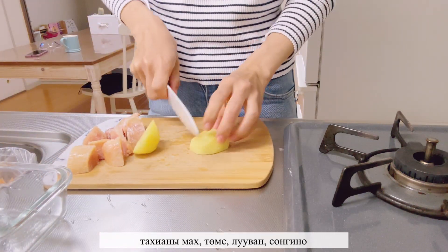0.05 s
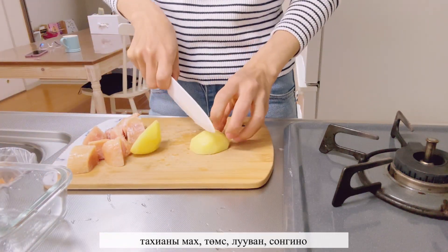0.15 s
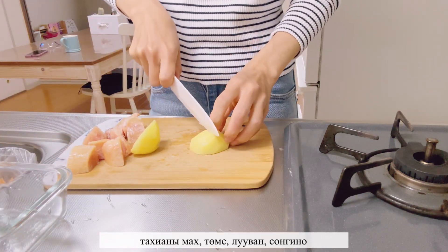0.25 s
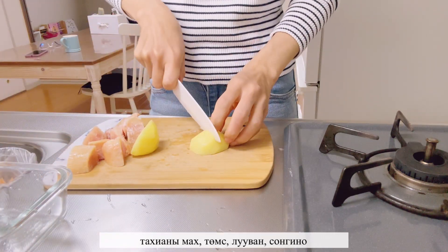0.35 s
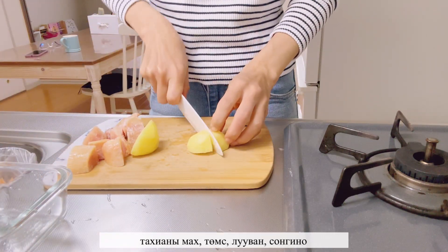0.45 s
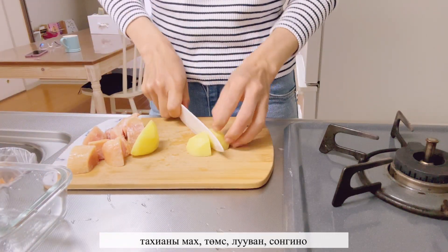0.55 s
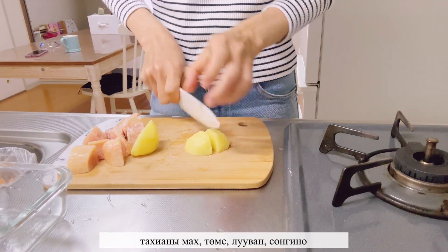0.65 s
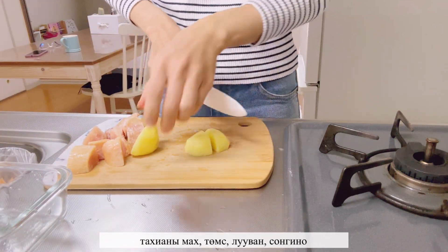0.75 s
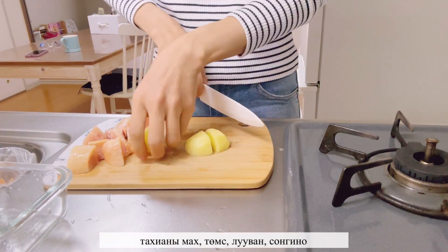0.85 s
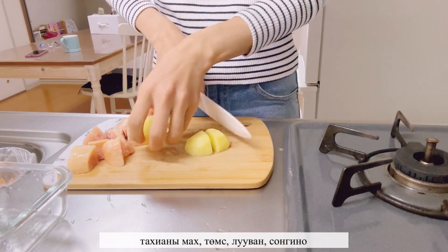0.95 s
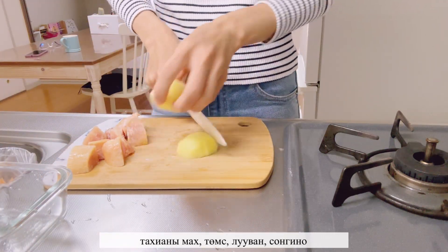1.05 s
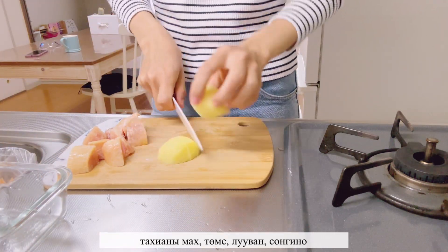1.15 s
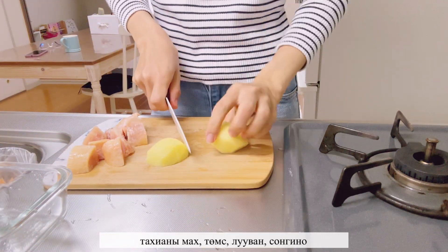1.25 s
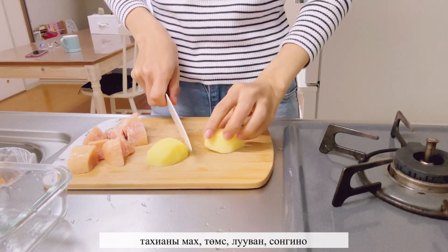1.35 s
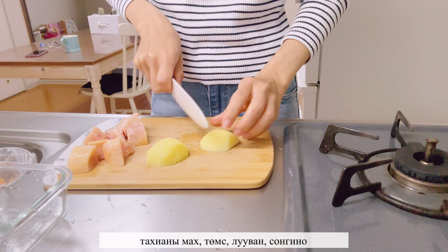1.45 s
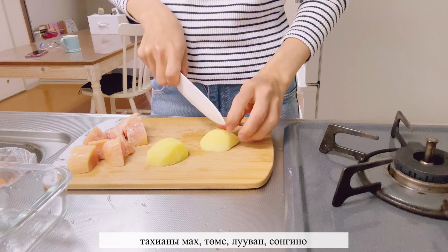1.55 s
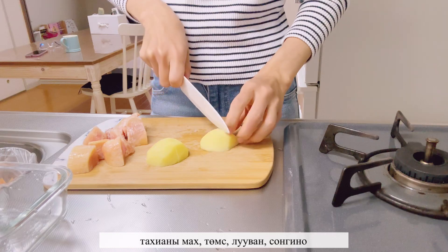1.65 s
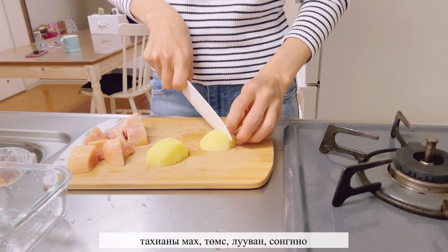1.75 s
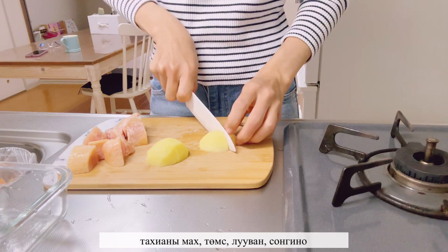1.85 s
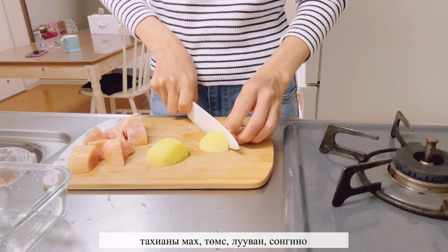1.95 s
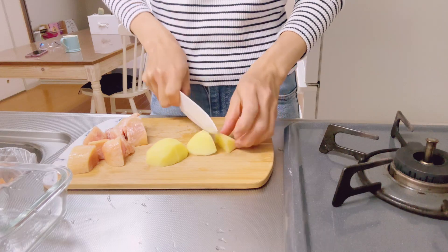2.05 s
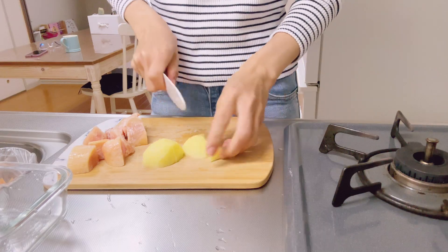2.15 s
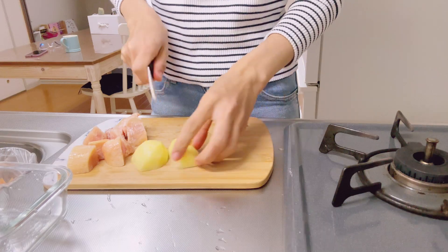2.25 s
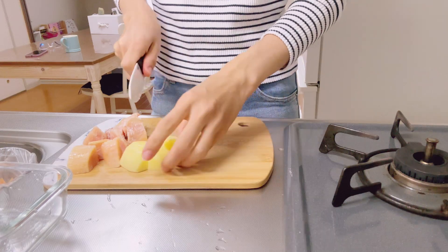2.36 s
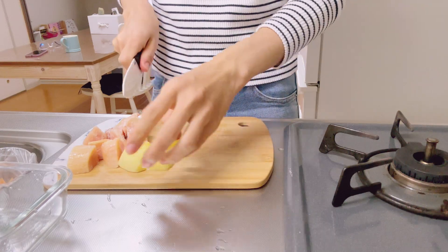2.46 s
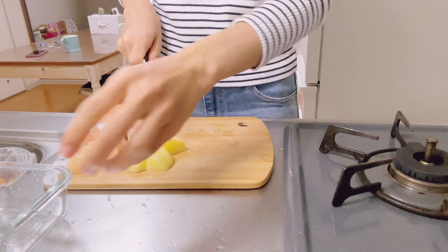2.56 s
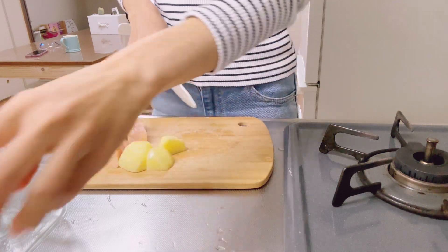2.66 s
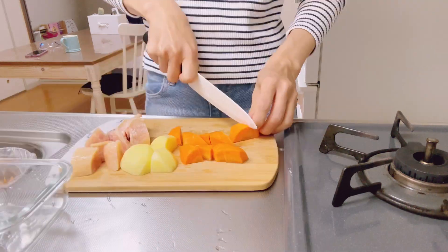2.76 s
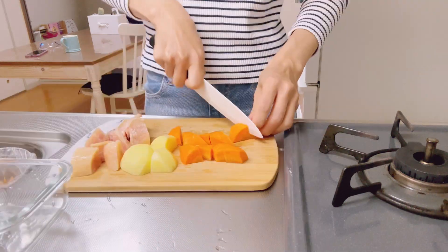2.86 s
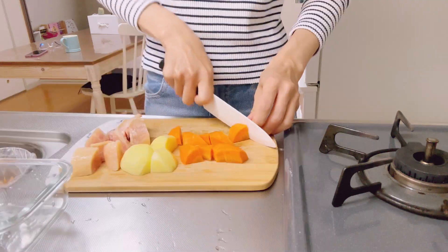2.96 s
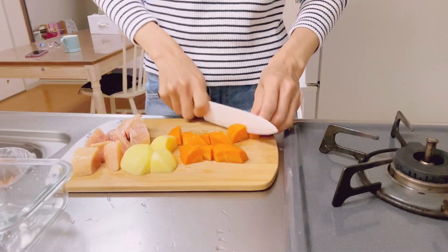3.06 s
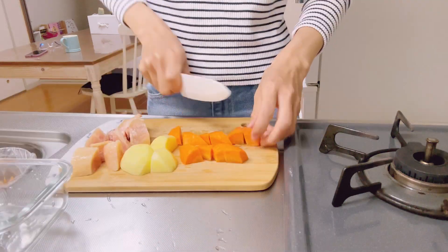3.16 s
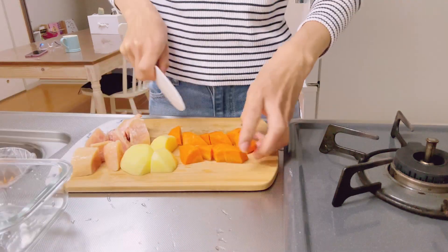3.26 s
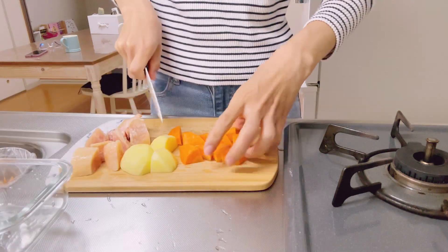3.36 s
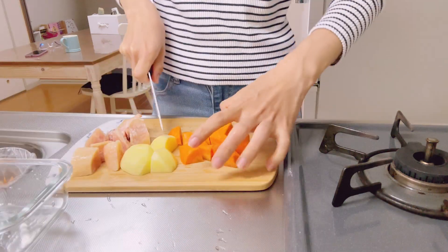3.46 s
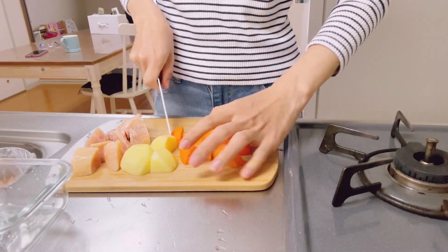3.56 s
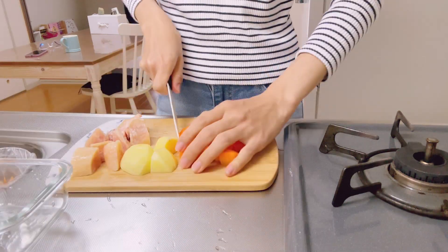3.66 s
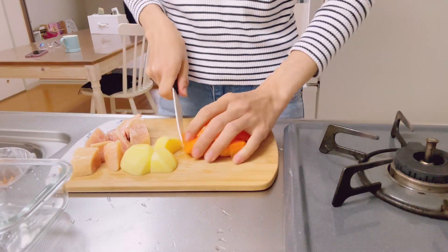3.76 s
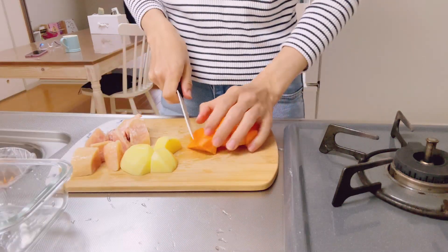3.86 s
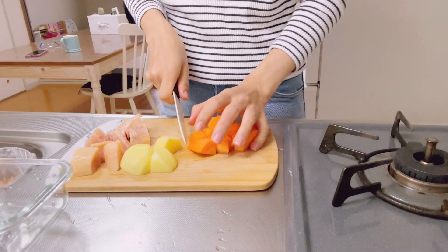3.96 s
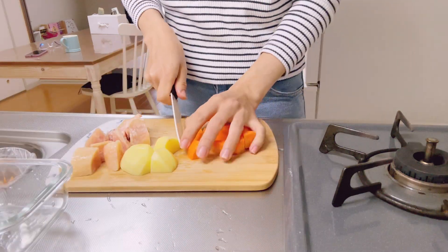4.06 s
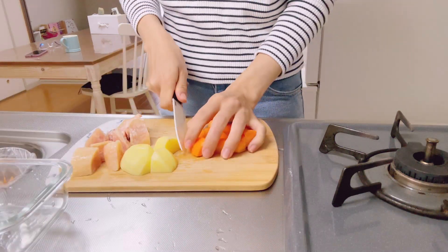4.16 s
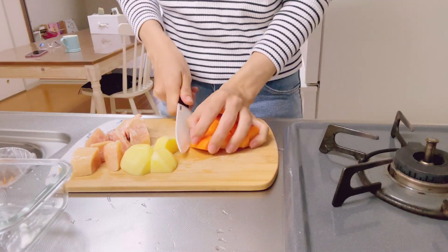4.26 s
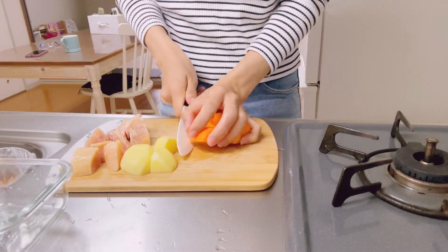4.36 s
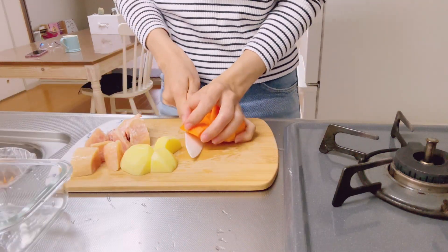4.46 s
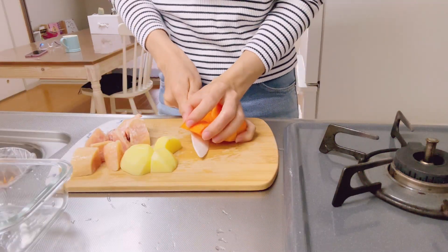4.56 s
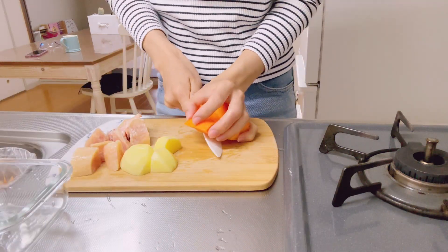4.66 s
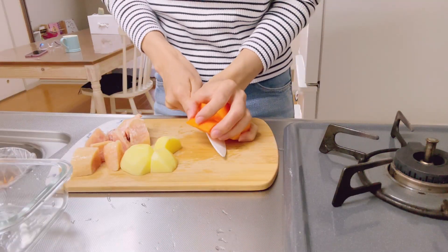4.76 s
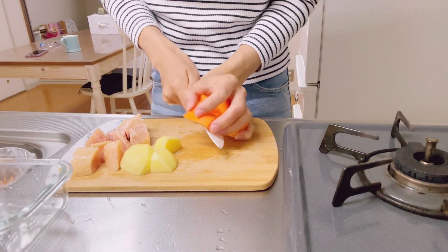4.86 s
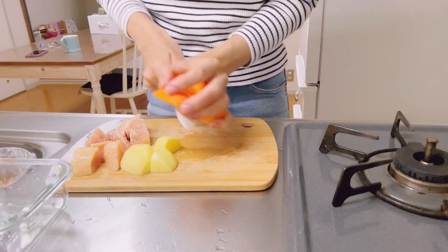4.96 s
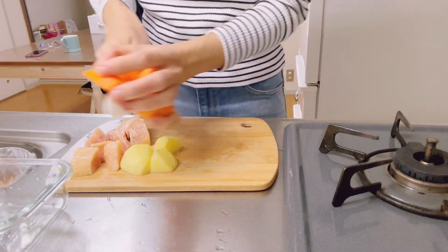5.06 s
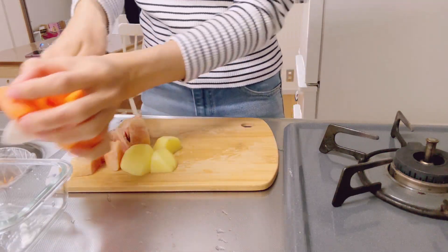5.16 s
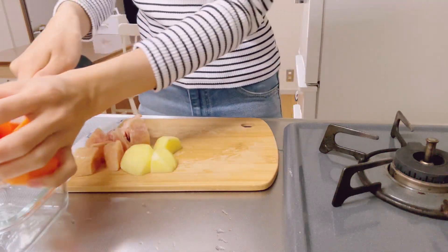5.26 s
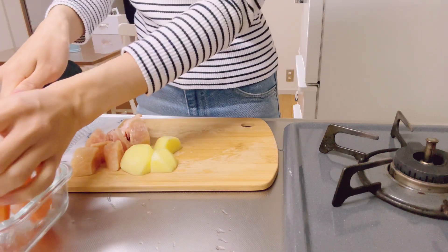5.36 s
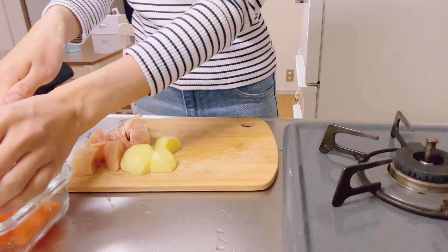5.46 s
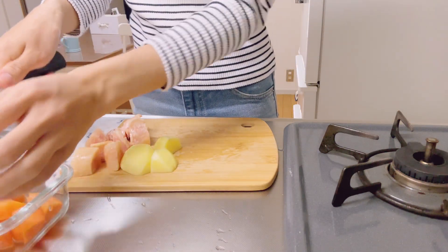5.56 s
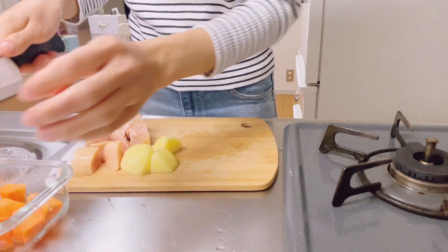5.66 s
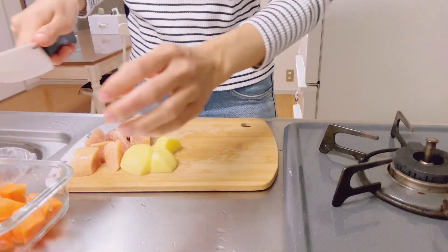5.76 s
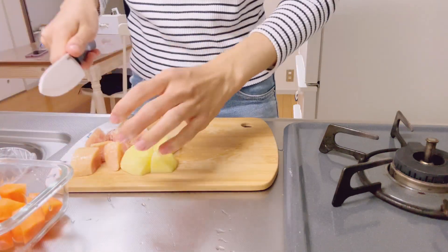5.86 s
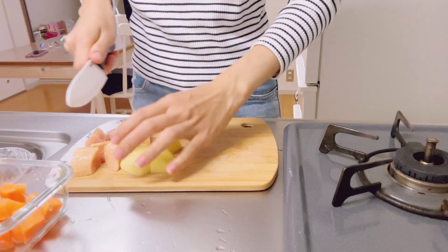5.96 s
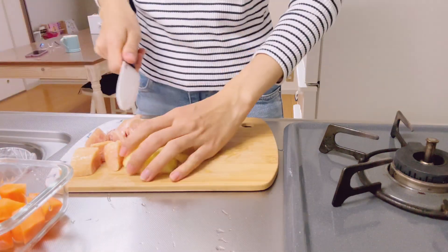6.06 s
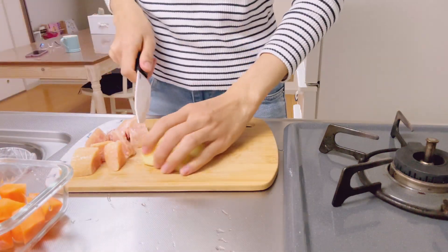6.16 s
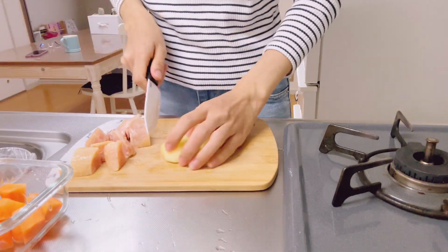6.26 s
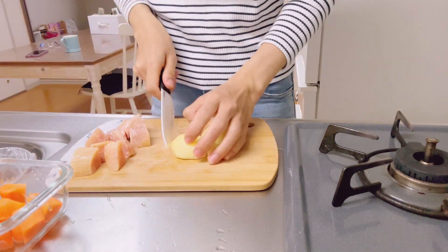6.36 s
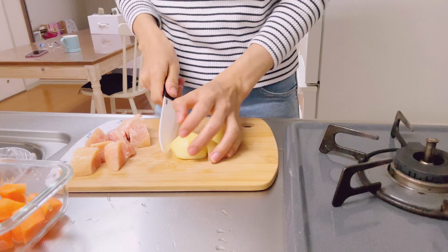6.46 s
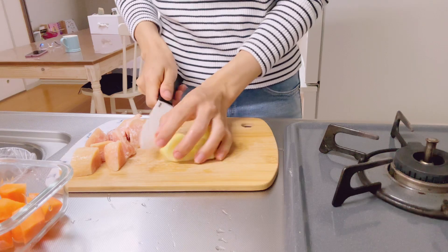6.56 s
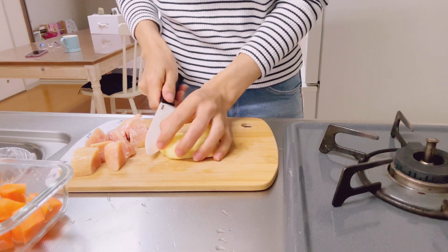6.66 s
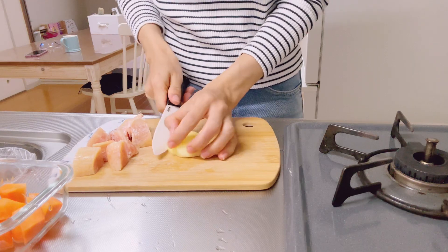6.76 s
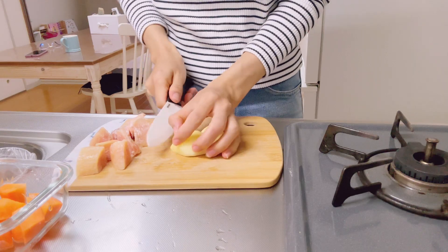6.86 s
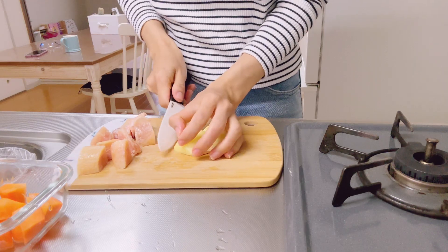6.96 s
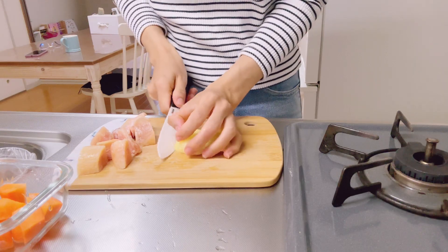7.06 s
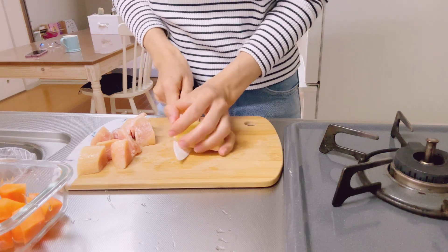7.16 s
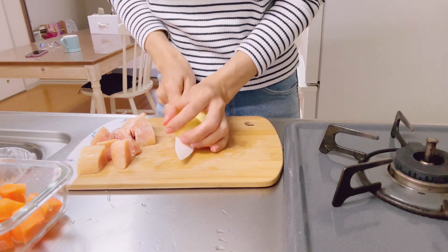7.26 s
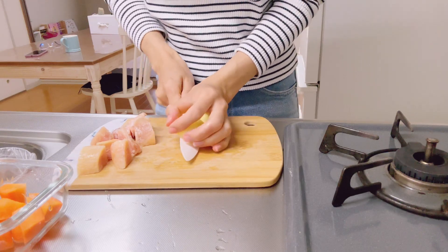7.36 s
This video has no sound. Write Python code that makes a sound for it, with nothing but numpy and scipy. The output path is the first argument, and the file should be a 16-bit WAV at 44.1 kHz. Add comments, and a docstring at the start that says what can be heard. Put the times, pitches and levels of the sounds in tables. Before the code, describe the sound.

Heard close up in a small, softly humming kitchen, three spaced knife cuts go through potato and carrot, each a moist crunch ending in a sharp knock on a wooden board. Small taps and wet clicks surround them. The blade then drags across the wood to gather the pieces, carrot chunks clatter briefly into a glass bowl, and potato pieces are scraped up with a few more knocks.

```python
"""A small, hard kitchen, two microphones close to a wooden board on a steel counter. A knife slices
potato and carrot; hands slide the pieces about and tip the carrot into a glass bowl. Blows ring the
board, the counter and the bowl; cells burst, wet cut faces hiss and snap, the dragging blade sings.
The room answers briefly and hums softly underneath."""
import sys
import numpy as np
from scipy import signal
from scipy.fft import rfft, irfft, next_fast_len
from scipy.io import wavfile
from scipy.ndimage import uniform_filter1d

SR = 44100
rng = np.random.default_rng(int(sys.argv[2]) if len(sys.argv) > 2 else 0)


def unload_audio(sound):
    """Save the sound as a 16-bit wav file, at the path given as the first command line argument."""
    columns = np.transpose(np.atleast_2d(sound))
    # keep every value between -1 and 1, then stretch to whole-number steps
    steps = np.round(np.clip(columns, -1, 1) * 32767)
    wavfile.write(sys.argv[1], SR, steps.astype(np.int16))


N = 327222

# modes of the steel top and of the wooden board: (frequency [Hz], level [dB], free t60 [s])
COUNTER_MODES = [(106.35, 5.5, 0.32), (128.3, 4, 0.39)]
BOARD_MODES = [(238, 3, 0.04), (339, 9, 0.041), (399, 4, 0.041), (539, 1, 0.064), (703, -4, 0.042),
               (906.6, -6, 0.034), (1062, -7.5, 0.075), (1206, -10.5, 0.013), (1535, 6, 0.09),
               (1724, 2.5, 0.034), (1905, 8.5, 0.066), (2140, -2.5, 0.022), (2377, 3.5, 0.13),
               (2570, -1, 0.042), (2910, 0, 0.022), (3239, -2.5, 0.025), (3960, 11.5, 0.044),
               (4520, 6, 0.014), (4615, -2.5, 0.0011)]
# light knocks on the board, and pieces landing in the bowl:
# (time [s], thud [dB], boom, body, knock, tick [dB above thud], left above right [dB])
BOARD_TAPS = [(0.009, -29, -6.5, -13, -22.5, -31, -1), (0.225, -48.5, 1, -29, -40, -30.5, 1),
              (0.269, -40, 2.5, -35, -38, -22, -2), (0.317, -35.5, -4.5, -17, -7, -9, -2),
              (0.835, -49, -11, -10, 0.5, -11, -1), (0.865, -39.5, -3.5, -5.5, 0.5, -11.5, -3),
              (1.012, -39, -14, -28, -18, -12, 3), (1.039, -40.5, -5.5, -21, -36.5, -21.5, -2),
              (1.261, -41.5, 1.5, -19, -4, -10, -2), (1.28, -42, 6, -32, -16.5, -11, 4),
              (1.391, -22.5, -11.5, -34, -22.5, -28.5, 0), (1.623, -55.5, -1, -24, -10.5, 0, -21),
              (1.696, -43, -24, -27.5, -4.5, -5, 5), (2.118, -32.5, -11, -8, -19, -12.5, -1.5),
              (2.262, -60, 4.5, -11.5, -8, -5, 8), (2.316, -52.5, 9.5, -7.5, -12.5, 1.5, 4.5),
              (2.759, -36.5, -8, -12, -20, -31, 11.5), (2.768, -39, -14, 8, -3.5, -20.5, -2),
              (2.891, -33.5, -18, 13.5, 0, -6, 0.5), (3.165, -37.5, -21, 1.5, -21, -28.5, 4.5),
              (3.367, -48, -9, 2, -34, -19.5, -0.5), (3.448, -44.5, -14.5, -2, -37, -47.5, -2),
              (3.499, -40, -20.5, -20, -43, -35, 0.5), (3.538, -35, -9, -11, -23, -26, 0),
              (3.596, -35.5, -6, 3.5, -34, -23, -0.5), (3.727, -43.5, -9, -21, -12, -9.5, -5),
              (3.836, -37, -12.5, -7.5, -29, -23, 0), (3.925, -31, -12, 0, -29.5, -39, 0.5),
              (3.982, -27, -30, -5.5, -23, -27, -3.5), (4.091, -15.5, -27, 1, -13.5, -40.5, -2.5),
              (4.25, -42, -18, -12, -12, -32, -24), (4.396, -22, -21.5, -14, -19.5, -22.5, 3.5),
              (4.55, -40, -19.5, -28, -24, -29.5, 0.5), (6.048, -40.5, -2.5, -22, -29.5, -28, 6),
              (6.132, -40.5, -10, -19, -30, -20.5, 1.5), (6.658, -51, -0.5, -14, 2, 8, -11.5),
              (6.865, -26, -10, -7.5, -19.5, -45.5, -2.5), (6.999, -19, -12.5, 0.5, -7.5, -55, -2.5),
              (7.173, -29, -16.5, -40, -40, -27.5, 1)]
BOWL_DROPS = [(5.313, -20.5, -10.5, -11, -15.5, -42, 0.62), (5.324, -29, -9, -6, -3, -30.5, 0.45),
              (5.353, -19, -10, -11, -34, -22, 1.55), (5.384, -18, -6.5, -8.5, -23, -31, .5),
              (5.393, -25.5, -25, -12, -7, -32.5, 1.6), (5.405, -21, -15, -2, -11, -30.5, 2.45),
              (5.438, -23, -23, -2.5, -12.5, -20, 1.6), (5.45, -28.5, -12, -13, -31, -30, 1.1),
              (5.481, -23, -11.5, -4, -32, -40, 1.4), (5.529, -36.5, -6, -6, -23.5, -42, .9)]
# the board shaking after each chop: (time [s], rattle [dB], hiss, edge, rumble [dB above rattle])
SHUDDERS = [(0.46, -23.5, -26, -6.5, -1.5), (1.876, -29, -29, -16.5, 4), (2.915, -30.5, -6.5, -15, 11)]


def amp(db):
    return 10 ** (np.asarray(db) / 20)


def unit(x):
    return x / np.sqrt(np.mean(x ** 2) + 1e-20)


def along(points, hz):
    """Read (frequency, value) points on a log frequency axis."""
    freqs, values = np.transpose(points)
    return np.interp(np.log(hz + 1), np.log(freqs + 1), values)


def filtered(x, response):
    """Pass x through a complex response of frequency."""
    size = next_fast_len(x.shape[-1] + 8192)
    return irfft(rfft(x, size) * response(np.fft.rfftfreq(size, 1 / SR)), size)[..., :x.shape[-1]]


def colour(spectrum):
    """Response through (frequency [Hz], level [dB]) points."""
    return lambda hz: amp(along(spectrum, hz))


def resonances(modes, damping):
    """Response of modes whose ringing a hand or piece shortens by the factor damping."""
    def response(hz):
        total = 0
        for k, (centre, db, t60) in enumerate(modes):
            loss = 1j * hz * damping * np.log(1000) / np.pi / t60
            total = total + (-1) ** k * amp(db) * loss / (centre ** 2 - hz ** 2 + loss)
        return total
    return response


def board_band(low_hz, high_hz, damping):
    """Response of the board's modes within a band."""
    return resonances([mode for mode in BOARD_MODES if low_hz < mode[0] < high_hz], damping)


def diffuse(pair):
    """Two unrelated noises become a diffuse field, alike at both microphones in the bass."""
    # (frequency [Hz], left-right correlation [ratio])
    likeness = [(40, 0.86), (130, 0.81), (290, 1), (640, .05), (15000, 0.044)]

    def weights(hz):
        angle = np.arccos(np.clip(along(likeness, hz), -1, 1)) / 2
        return np.array([np.cos(angle), np.sin(angle)])
    mid, side = np.moveaxis(filtered(pair, weights), -2, 0)
    return np.stack([mid + side, mid - side], -2)


def grit(grain_db, samples):
    """Noise whose strength jumps from grain to grain."""
    return rng.standard_normal(N) * amp(grain_db * unit(uniform_filter1d(rng.standard_normal(N), samples)))


def wide_grit(response, grain_db, samples, apart):
    """Filtered grit from a wide source: part of it differs at the two microphones."""
    common, left, right = (filtered(grit(grain_db, samples), response) for _ in range(3))
    return unit(common + apart * np.array([left, right]))


def contacts(rows, fall_db_per_s):
    """Gain of contacts that rise, hold and let go: one track, plus one for each extra level column."""
    t, tracks = np.arange(N) / SR, 0
    for start, rise, hold, start_db, end_db, *above_db in rows:
        end = start + rise + hold
        db = np.interp(t, [start, start + rise, end, end + 1],
                       [start_db - 20, start_db, end_db, end_db - fall_db_per_s])
        tracks = tracks + amp([0, *above_db])[:, None] * amp(db) * (t >= start)
    return tracks


def dying(starts, t60):
    """Gain of (time [s], level [dB]) kicks that fade away."""
    kicks = np.zeros(N)
    for start, db in starts:
        kicks[round(start * SR)] = amp(db)
    return signal.lfilter([1], [1, -amp(-60 / (t60 * SR))], kicks)


def catching(depth_db=2.5, catch_s=0.0067):
    """Gain of friction that catches and slips unevenly."""
    span = round(catch_s * SR) + 1
    return amp(depth_db * unit(uniform_filter1d(uniform_filter1d(rng.standard_normal(N), span), span)))


def struck(blows, modes, max_cycles, detune, high_db, sharp_db):
    """Every blow rings the modes at new strengths, booms in the counter and ticks."""
    # where the eight levels of band_db lie: (frequency [Hz])
    bands_hz = [160, 200, 350, 560, 950, 1750, 2500, 4000]
    out, t = np.zeros((2, N + SR)), np.arange(SR // 3) / SR
    hz, mode_db, t60 = np.transpose(COUNTER_MODES + modes)[:, :, None]
    t60 = np.minimum(t60, max_cycles / hz)
    rise = (1 - np.exp(-t * hz / 0.32)) ** 2  # a mode takes about a cycle to build up
    envelope = amp(mode_db - 60 * t / t60 - 3.5) * rise
    for start, thud_db, boom, body, knock, tick_db, pan_db in blows:
        edge = knock + 0.27 * (tick_db - knock)
        band_db = [boom + 3.5, 0, 0, body - 2, body + 6, knock + 4, knock + high_db, edge + sharp_db]
        strength = amp(np.interp(np.log(hz), np.log(bands_hz), band_db))
        # hand and food load the plate anew each time
        pitch = hz * (1 + detune * rng.standard_normal(hz.shape) * (hz > bands_hz[0]))
        rings = envelope * strength * np.exp(2j * np.pi * pitch * t)
        # each microphone faces another part of the vibrating plate
        scatter_db = rng.normal(0, 1.8, len(hz)) + rng.normal(0, 1.8, (2, len(hz)))
        pickup = amp(scatter_db) * np.exp(.4j * rng.standard_normal((2, len(hz))))
        tick = np.diff(rng.standard_normal(len(t) + 1)) * amp(tick_db + 0.5 - 60 * t / 0.022)
        gain = amp(thud_db + np.array([[.5], [-.5]]) * pan_db)
        out[:, round(start * SR):][:, :len(t)] += gain * ((pickup @ rings).imag + tick)
    return out[:, :N]


def room_hum(level_db=-55.5):
    """Steady, low room tone from all around the microphones."""
    # (frequency [Hz], relative density [dB])
    spectrum = [(12, -40), (20, -19), (44, -6), (65, -0.5), (81, -8), (116, -19), (153, -13), (354, -22),
                (494, -27.5), (537, -22.5), (601, -27.5), (1050, -44.5), (7810, -54), (13300, -56.5),
                (15700, -79)]
    return amp(level_db) * unit(diffuse(filtered(rng.standard_normal((2, N)), colour(spectrum))))


def friction_gains():
    """How hard strokes, slices, shudders, taps and leaning hands work each friction layer."""
    # hands, pieces and blade sliding; the blade sinking through flesh until the board stops it:
    # (time [s], rise [s], hold [s], fine hiss at start, at end of hold [dB],
    #  coarse hiss, rub, rumble [dB above fine hiss])
    strokes = [(0, 0.0022, 0.055, -55.5, -91, 0, -15, 17.5), (.255, 0.018, 0.011, -68, -80.5, 1, -17, -13),
               (.828, 0.0058, 0.058, -70, -75, 9, 6, 17.5),
               (1.006, 0.0054, 0.21, -63.5, -68, -4.5, -5, 1.5),
               (1.255, .008, 0.017, -49.5, -73, -0.5, -7.5, 9),
               (1.372, 0.021, 0.048, -57, -83.5, 9.5, 8, 15.5),
               (1.617, 0.0047, 0.097, -71, -60, 1, -6, -13), (1.95, 0.068, 0.07, -86, -76, -16, -1.5, 16.5),
               (2.108, .005, .14, -60, -67, -3, -10.5, -4), (2.257, 0.0068, 0.036, -61, -66, -0.5, 2, -6.5),
               (2.305, 0.018, 0.072, -58.5, -63.5, -2.5, -7.5, -2),
               (2.755, .005, .015, -68.5, -78, 17, 20, 27.5),
               (3.06, 0.081, 0.15, -68.5, -62.5, -3.5, -19.5, 2),
               (3.533, .006, .03, -67, -77.5, -3.5, 0.5, 12.5), (3.575, 0.027, 0.12, -65, -61, -1, -2, 4),
               (3.71, 0.026, .11, -57.5, -65.5, 0, -1.5, 2),
               (3.93, 0.065, 0.092, -68.5, -67.5, -1.5, 3, 10),
               (4.11, 0.027, 0.26, -66, -58, 6.5, 11.5, 5.5),
               (4.55, 0.045, 0.069, -62.5, -58, 6.5, 13.5, 23.5),
               (4.79, 0.033, 0.18, -84, -88.5, 3, 8.5, 13.5), (4.97, 0.055, 0.13, -77.5, -71, -1.5, 2.5, 5),
               (5.155, .035, .02, -55, -67.5, -4.5, -10, -13),
               (5.21, 0.011, 0.11, -72, -66.5, -2, -5.5, 10), (5.308, 0.0042, 0.13, -75, -64.5, 3, 15, 32),
               (5.428, 0.011, 0.015, -42, -60, 0.5, 7.5, 8), (5.47, 0.013, 0.046, -63.5, -81, -8, 1, 35),
               (6.04, 0.035, 0.087, -61.5, -60.5, -1, -5, -11), (6.16, 0.031, .15, -54.5, -62, -2, -11, -8),
               (6.37, 0.0041, 0.019, -60.5, -67.5, 1, -4.5, -5.5),
               (6.39, 0.059, 0.2, -63.5, -71, -1, 0.5, 3.5), (6.65, 0.0037, 0.22, -61.5, -78, 3, 1.5, -1.5),
               (6.86, 0.011, 0.062, -76, -79.5, 4, 4, 26.5),
               (6.995, 0.011, 0.087, -61.5, -63.5, 8.5, 11, 15),
               (7.09, 0.0407, 0.0093, -50.5, -60, 1, 11, 16), (7.15, 0.013, 0.072, -61, -67, -12, -2, -13)]
    slices = [(.298, 0.025, .135, -54.5, -46.5, 2.5, 4, 10.2),
              (1.686, 0.0064, .174, -61, -45, -0.5, -3, 6.7), (2.775, 0.011, .125, -61, -56.5, 2, -1, 13)]
    # hands leaning on the counter: (time [s], boom [dB])
    leaning = [(0.0, -65), (0.47, -58), (0.64, -60), (1.15, -62.5), (1.51, -54), (2.27, -55), (2.52, -62),
               (2.73, -62.5), (2.95, -52), (3.39, -68), (3.9, -52.5), (4.3, -48.5), (4.81, -68),
               (5.27, -60), (5.48, -44.5), (5.83, -64), (6.9, -54), (7.05, -45.5), (7.42, -60.5)]
    fine, coarse, rub, rumble = contacts(strokes, fall_db_per_s=420) + contacts(slices, fall_db_per_s=1500)
    boom = amp(np.interp(np.arange(N) / SR, *np.transpose(leaning)))
    chop_hiss = dying([(s, db + hiss) for s, db, hiss, _, _ in SHUDDERS], t60=0.29)
    chop_rumble = dying([(s, db + low) for s, db, _, _, low in SHUDDERS], t60=0.39)
    taps = BOARD_TAPS + BOWL_DROPS  # each rattles on briefly
    tap_rub = dying([(s, thud + knock - 12.5) for s, thud, _, _, knock, *_ in taps], t60=0.12)
    tap_rumble = dying([(s, thud - 16.5) for s, thud, *_ in taps], t60=0.12)
    return (fine * catching() + amp(-10) * chop_hiss,
            coarse * catching() + chop_hiss,
            rub * catching() + tap_rub,
            rumble + amp(-11.5) * boom + chop_rumble + tap_rumble,
            boom)


def friction():
    """Sliding faces hiss in the air and drive the board and the counter."""
    # hiss of wet faces and of coarser friction: (frequency [Hz], relative density [dB])
    fine_spectrum = [(4240, -42), (7200, -5.5), (8530, -2), (10500, -2.5), (12700, 0.5), (15400, -9),
                     (15700, -29.5)]
    coarse_spectrum = [(1880, -42), (3200, -13), (3470, -5), (5650, -7), (6120, -3.5), (7400, -14),
                       (9620, -41.5), (16300, -120)]
    fine, coarse, rub, rumble, boom = friction_gains()
    out = fine * wide_grit(colour(fine_spectrum), grain_db=2, samples=60, apart=0.92)
    out += coarse * wide_grit(colour(coarse_spectrum), grain_db=2, samples=100, apart=8.5)
    out += rub * wide_grit(board_band(1400, 3500, damping=1), grain_db=1.2, samples=200, apart=3.5)
    lumps = np.array([grit(grain_db=2.5, samples=600) for _ in range(2)])
    out += rumble * unit(diffuse(filtered(lumps, board_band(0, 1400, damping=1.16))))
    counter = filtered(grit(grain_db=1.5, samples=1500), resonances(COUNTER_MODES, damping=1.1))
    return out + boom * unit(counter)


def board_taps():
    """Light knocks on the board: blade or pieces set down, the carrot cracking before the last chop."""
    return struck(BOARD_TAPS, BOARD_MODES, max_cycles=36, detune=0.08, high_db=-8, sharp_db=-0.5)


def wet_snaps():
    """Wet faces let go with a click of about a millisecond."""
    # (time [s], level [dB])
    snaps = [(0.0916, -45.5), (0.1635, -53), (0.5639, -32), (1.1029, -48.5), (1.1389, -51.5), (1.2894, -55),
             (1.3744, -51), (2.7846, -44), (2.9714, -30), (2.9789, -31.5), (3.4928, -71.5), (3.619, -44.5),
             (4.0823, -43), (4.577, -38.5), (5.1603, -45.5), (5.5976, -48.5), (5.8115, -58), (6.3738, -39),
             (6.4092, -54), (6.5121, -42), (6.5441, -41), (6.6268, -48.5), (6.771, -46.5), (7.1632, -30.5),
             (7.217, -40.5)]
    out, t = np.zeros(N + SR), np.arange(400) / SR
    for start, db in snaps:
        bright_noise = np.diff(rng.standard_normal(len(t) + 1))
        out[round(start * SR):][:len(t)] += bright_noise * amp(db + 0.5 - 60 * t / .004)
    return out[:N]


def blade_scrapes():
    """Dragging against rough wood or flesh shakes the ceramic blade's modes."""
    # (time [s], rise [s], hold [s], level at start, at end of hold [dB])
    drags = [(.31, 0.03, .1, -69, -45), (1.69, 0.038, 0.14, -59.5, -52), (4.11, 0.027, 0.27, -82, -48),
             (4.555, 0.035, 0.11, -57, -61.5), (6.36, 0.013, 0.184, -75, -68),
             (6.995, .01, 0.14, -60, -51.5), (7.155, 0.0088, 0.075, -50, -66)]
    # (frequency [Hz], level [dB], free t60 [s])
    blade_modes = [(2824, 2, 0.053), (3725, 4, .04), (4300, -2.5, 0.039), (5950, -8.5, 0.023),
                   (6744, 0, 0.034), (10000, 2, 0.028), (11730, -15, 0.02), (12500, -1, .025)]
    gain = contacts(drags, fall_db_per_s=400)[0] * catching()
    return gain * wide_grit(resonances(blade_modes, damping=1.7), grain_db=4, samples=150, apart=1.5)


def flesh_splits():
    """The flesh splits ahead of the blade: cells burst in a bright crackle over a lower crunch."""
    # (time [s], rise [s], hold [s], crackle at start, at end of hold [dB], crunch [dB above crackle])
    splits = [(.415, 0.0079, 0.025, -43.5, -26, -6.5), (.555, 0.0074, 0.0037, -49, -39.5, 7),
              (2.888, 0.0039, 0.017, -34.5, -28.5, 6.5), (2.965, .02, 0.0066, -41, -33, -11.5)]
    # bursting cells: (frequency [Hz], relative density [dB])
    crackle_spectrum = [(4410, -28), (7500, -21), (8750, -14), (10200, -5.5), (12100, -5.5), (14700, -11),
                        (15700, -25)]
    crunch_spectrum = [(590, -30.5), (1000, -3), (1660, -4), (2700, -15), (3240, -9.5), (8000, -7),
                       (10400, -34.5), (17600, -120)]
    crackle_gain, crunch_gain = contacts(splits, fall_db_per_s=1800)
    crackle = unit(filtered(grit(grain_db=3.5, samples=30), colour(crackle_spectrum)))
    crunch = wide_grit(colour(crunch_spectrum), grain_db=3.5, samples=30, apart=1.0)
    return crackle_gain * crackle + crunch_gain * crunch


def knife_chops():
    """The blade breaks through and slams on the board."""
    # (time [s], thud [dB], boom, body, knock, tick [dB above thud], left above right [dB])
    chops = [(0.457, -21.5, -11.5, 5, -0.5, -12.5, -2), (1.872, -12.5, -20, 4.5, -4.5, -28.5, -1.5),
             (2.911, -13.5, -21, 5.5, -5, -27, 1.5)]
    return struck(chops, BOARD_MODES, max_cycles=36, detune=0.071, high_db=15, sharp_db=4.5)


def board_shudders():
    """After a chop the upper board modes rattle on, the highest (the edge) most briefly."""
    rattle = wide_grit(board_band(850, 2800, damping=2.4), grain_db=2.2, samples=200, apart=2.6)
    edge = wide_grit(board_band(2800, 4400, damping=4.5), grain_db=2.2, samples=200, apart=2.6)
    return (rattle * dying([(s, db) for s, db, *_ in SHUDDERS], t60=0.6)
            + edge * dying([(s, db + edge_db) for s, db, _, edge_db, _ in SHUDDERS], t60=0.45))


def bowl_drops():
    """Carrot pieces tumble into the bowl and ring the glass."""
    # (frequency [Hz], level [dB], free t60 [s])
    glass_modes = [(168.6, -9.5, 0.18), (227.3, 5.5, 0.071), (296, -8.5, 0.11), (369, 1.5, 0.13),
                   (439, 11.5, 0.037), (495, -12.5, 0.4), (625, 10, 0.068), (690, -7.5, 0.38),
                   (889, 4, 0.038), (1103.3, -2.5, 0.14), (1202, 2, 0.048), (1478, 5, 0.052),
                   (1875, 0.5, 0.071), (2140, -4, .05), (2390, -5.5, 0.18), (3100, -23, 0.033),
                   (3340, -6, 0.056), (3770, 8, 0.01), (4630, 3.5, 0.13)]
    return struck(BOWL_DROPS, glass_modes, max_cycles=400, detune=0.017, high_db=-2, sharp_db=-1.5)


def close_pair(x):
    """Direct sound meets the two microphones at slightly different times and levels."""
    # (frequency [Hz], left behind right [s])
    lag = [(100, .0002), (500, .0003), (2000, .0004), (4500, .0001), (7000, -.0001), (15000, -.0001)]
    # (frequency [Hz], left above right [dB])
    balance = [(100, 0), (300, 2), (800, -1.5), (1500, -0.5), (3000, -2), (12000, 0.5)]
    sides = np.array([[.5], [-.5]])
    delay = lambda hz: np.exp(-2j * np.pi * hz * sides * along(lag, hz))
    return filtered(x, lambda hz: delay(hz) * amp(sides * along(balance, hz)))


def wall_echoes(x):
    """Nearby hard faces return duller copies."""
    # (left delay [s], right delay [s], level [dB])
    echoes = [(.0045, 0.0048, -12.5), (0.0145, 0.013, -10), (0.021, 0.016, -20), (.024, 0.03, -17.5)]
    paths = lambda hz: sum(amp(db) * np.exp(-2j * np.pi * hz * np.array([[left], [right]]))
                           for left, right, db in echoes)
    return filtered(x, lambda hz: paths(hz) / (1 + 1j * hz / 4000))


def room_tail(x, stretches=25):
    """Each stretch of sound gets its own tail; every frequency dies at its own speed."""
    # (frequency [Hz], t60 [s])
    decay_times = [(100, 0.69), (500, 0.096), (2000, 0.49), (5000, 0.15), (12000, .3)]
    # (frequency [Hz], room above direct sound [dB])
    room_levels = [(100, -2), (500, -4.5), (2000, -8.5), (5000, -10), (12000, -23.5)]
    hz, t, noise = signal.stft(rng.standard_normal((stretches, 2, int(.8 * SR))), SR, nperseg=256)
    t60 = along(decay_times, hz)[:, None]
    decay = amp(along(room_levels, hz)[:, None] - 60 * t / t60) / np.sqrt(t60 * SR / np.log(1e6))
    tails = diffuse(signal.istft(noise * decay, SR, nperseg=256)[1])
    out, step, predelay = np.zeros((2, N + 2 * SR)), N // stretches + 1, int(.009 * SR)
    for k, tail in enumerate(tails):
        wet = signal.fftconvolve(x[None, k * step:(k + 1) * step], tail, axes=1)
        out[:, k * step + predelay:][:, :wet.shape[1]] += wet
    return out[:, :N]


def scene():
    """The work at the board from close by, with the kitchen behind it."""
    hits = knife_chops() + board_taps() + bowl_drops()
    sources = hits + wet_snaps() + flesh_splits() + friction() + board_shudders() + blade_scrapes()
    near = close_pair(sources) + wall_echoes(hits) + room_tail(sources[0])
    low_cut = lambda hz: (1j * hz / (1j * hz + 60)) ** 2  # the deepest bass, below about 60 Hz, is taken away
    return filtered(near, low_cut) + room_hum()


def record(dry):
    """The highest treble fades away; the loudest blows meet a soft ceiling; nothing above 15850 Hz."""
    # (frequency [Hz], gain [dB])
    treble_rolloff = [(12500, -1.5), (14200, -5), (15000, -3.5), (15800, -18)]
    x = filtered(dry, colour(treble_rolloff))
    x = x / (1 + np.abs(x / .97) ** 6) ** (1 / 6)
    return filtered(x, lambda hz: hz < 15850)


dry = scene()
out = record(dry)
unload_audio(out)
```